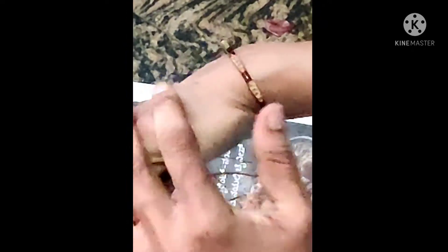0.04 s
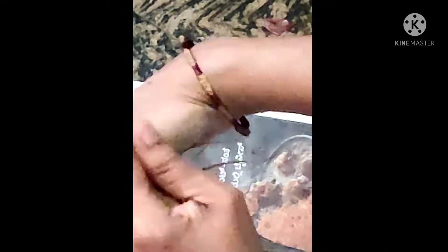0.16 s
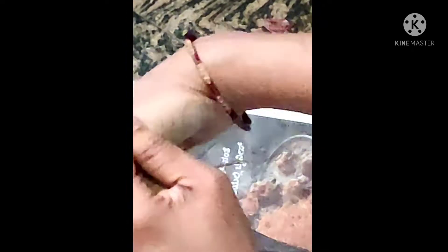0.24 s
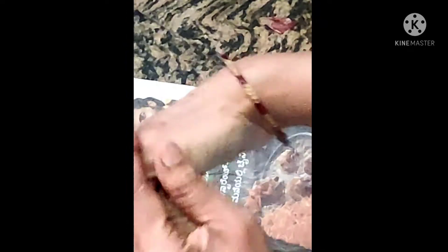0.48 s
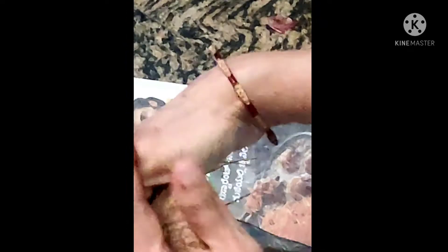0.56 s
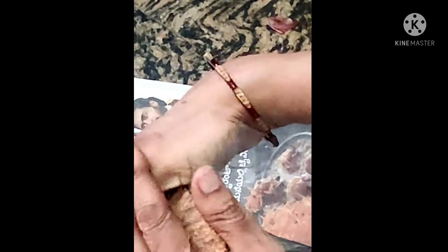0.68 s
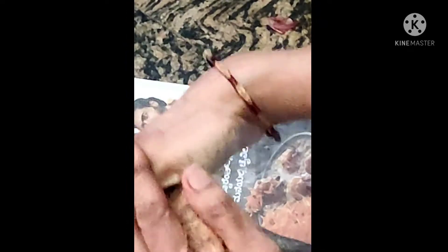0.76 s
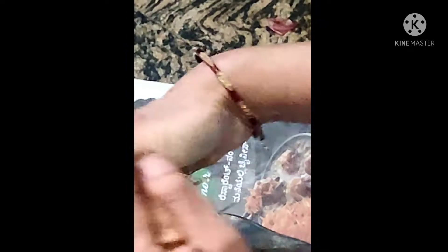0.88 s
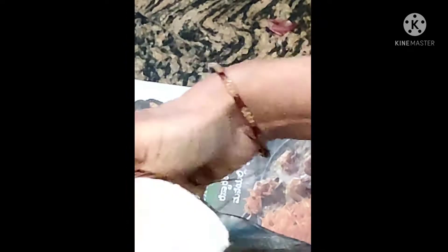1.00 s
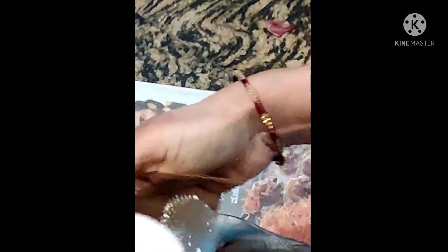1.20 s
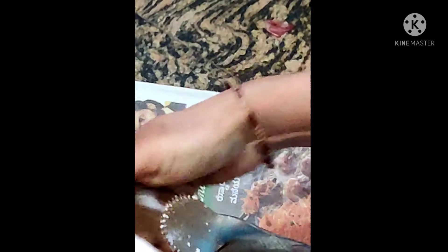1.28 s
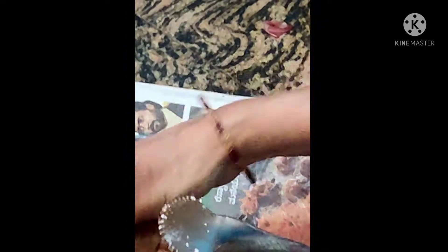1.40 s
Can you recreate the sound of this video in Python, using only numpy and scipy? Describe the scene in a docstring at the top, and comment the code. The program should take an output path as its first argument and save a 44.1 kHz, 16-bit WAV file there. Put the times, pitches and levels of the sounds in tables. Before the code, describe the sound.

Coconut flesh is pried from its shell with a knife: a small crack, then a much louder hollow crack ringing in a hard-walled kitchen, followed by soft knocks, rubs and faint scrapes, close to a phone microphone.

```python
"""A knife prises coconut flesh from its shell, close to a phone in a hard-walled kitchen.
The flesh gives with a small crack, then a loud one: bursts of noise, with fading tones for the hollow shell.
Soft knocks are short noise with tones, rubs are a swelling hum, scrapes are grainy noise; one click
is a single pulse and the hands bump dully. Fading noise makes the room's echo.
Behind it all lie a low hum of sine waves and the soft noise of room air."""
import sys
import numpy as np
from scipy import signal
from scipy.fft import rfft, irfft
from scipy.io import wavfile
from scipy.ndimage import uniform_filter1d

SR = 44100
rng = np.random.default_rng(int(sys.argv[2]) if len(sys.argv) > 2 else 0)


def to_wav(s):
    """Save 16-bit WAV."""
    ch = np.atleast_2d(s).T  # columns
    pcm = np.round(np.clip(ch, -1, 1) * 32767)  # PCM
    wavfile.write(sys.argv[1], SR, pcm.astype(np.int16))


N = 63945
T = np.arange(N) / SR  # seconds
HZ = np.maximum(np.fft.rfftfreq(N, 1 / SR), 1)  # kept above zero for the logarithms

# The two cracks of the flesh. Each row: start in seconds, snap level in dB, room level in dB,
# hollow ring level in dB, bass shelf in dB, top edge in Hz, left minus right of the snap in dB,
# pitch of the ring as a ratio.
CRACKS = [(0.2336, -27.5, -36.5, -37.5, -6.5, 7000, -9.5, 0.96),
          (0.3611, -9.5, -23, -23, -3.5, 8300, -3, 1)]
# The stages of each crack: a first split, a tear, the break.
# Each row: delay in seconds, level in dB, centre in Hz, decay time in seconds.
CRACK_STAGES = [(0, -16, 5000, .0006), (.0007, -1, 3000, .0007), (.002, 4, 7046, 0.0014)]
STAGE_RISE_S, STAGE_OCTAVES = 0.00038, 4.8
# Colour of the snap, then of its echo in the room. Each row: frequency in Hz, relative level in dB per Hz.
SNAP_COLOUR = [(80, -3.5), (400, -14.5), (800, -16), (1150, -7.5), (1550, 3), (2220, -8), (2930, 1),
               (4200, -6), (5200, -3.5), (6600, 4.5), (8200, -12), (9300, -22), (15000, -26.5)]
ECHO_COLOUR = [(60, -10), (110, -10), (180, -6), (280, -3.5), (480, -7), (720, 2.5), (1000, -5), (1250, -5),
               (1600, 1), (2300, -5.5), (3000, -1), (4200, -5.5), (5300, -3.5), (6500, 1), (8000, -6.5),
               (9300, -13), (15000, -19.5)]
BASS_SHELF_HZ, ECHO_DELAY_S = 1200, 0.003

# Ring of the hollow shell and the surface under it.
# Each row: frequency in Hz (before the pitch ratio), relative level in dB, time to fall 60 dB in seconds.
HOLLOW_MODES = [(189.8, -21.5, 0.91), (451.2, -18, 0.62), (526.8, -6.5, 0.21), (642, -8.5, 0.39),
                (675.3, -1, 0.31), (699.2, -10, 0.34), (1498, -15, 0.52), (2060, -12.5, .4),
                (2838, -9, .35), (2894, -8, .35)]
HOLLOW_RISE_S = 0.01
# The waver of every ring: level in dB, phase in radians, random points per second.
RING_WAVER_DB, RING_WAVER_RAD, RING_WAVER_RATE = 3, 0.56, 45

# Soft knocks of shell and blade.
# Each row: start in seconds, thud level in dB, ring level in dB, centre of the thud in Hz.
KNOCKS = [(.612, -39, -52, 1343), (.901, -59, -74, 2800), (1.120, -50.5, -65, 880),
          (1.1905, -44.5, -54, 1920), (1.230, -46.5, -55, 2370), (1.248, -43.5, -51, 1100)]
# What the knocks ring with. Each row: frequency in Hz, relative level in dB, time to fall 60 dB in seconds.
KNOCK_MODES = [(713, 6, 0.1333), (827.5, -2, 0.3), (1329, -4, 0.25), (1595, -0.5, 0.5), (1804, -7.5, 0.81),
               (2503, -2.5, 0.33)]
KNOCK_DECAY_S, KNOCK_OCTAVES = 0.0052, 0.56
KNOCK_ROOM_DB = -15.5  # relative to the thud

# Rubs that make the hollow hum.
# Each row: time of the peak in seconds, level in dB, rise in seconds, fall in seconds.
RUBS = [(0.516, -44, 0.017, 0.025), (0.676, -55.5, 0.0056, 0.027), (0.731, -46, 0.016, 0.021),
        (1.312, -47.5, 0.058, 0.071)]
RUB_HZ, RUB_WIDTH_HZ = 673, 83
RUB_ROUGH = 0.57  # share of noise beside the steady tone

# Blade scrapes. Each row: start in seconds, level in dB, decay time in seconds, centre in Hz,
# room level in dB relative to the scrape.
SCRAPES = [(0.057, -63.5, .03, 11050, -12), (0.212, -55.5, 0.0049, 4770, -10), (.925, -68, .15, 5030, -26),
           (1.113, -64, 0.0135, 5380, 0), (1.246, -58, 0.098, 3300, -3)]
# Colour of the blade. Each row: frequency in Hz, relative level in dB.
BLADE_COLOUR = [(1000, 1.5), (3500, -3), (5200, -8.5), (6500, 1), (7600, -10.5), (9300, -19.5),
                (12500, -14), (15000, -22)]
SCRAPE_OCTAVES, SCRAPE_GRAIN = 1.15, 0.52
# One dry click of the blade tip: time in seconds, level in dB, centre in Hz.
CLICK_S, CLICK_DB, CLICK_HZ = 1.085, -32.5, 5720

# Dull bumps of the hands. Each row: start in seconds, level in dB.
BUMPS = [(1.262, -44.5), (1.313, -47), (1.35, -46), (1.384, -49)]
# Colour of the bumps. Each row: frequency in Hz, relative level in dB.
BUMP_COLOUR = [(30, -15), (75, -2.5), (140, 8), (220, -7), (400, -6), (1000, -42), (4000, -50.5)]
BUMP_DECAY_S = 0.031

# How long the kitchen echoes. Each row: frequency in Hz, time to fall 60 dB in seconds.
ROOM_T60 = [(150, 0.36), (600, 1), (1500, 0.48), (3000, 0.54), (6000, 0.51), (9000, 0.41), (15000, 0.12)]
EARLY_DB, EARLY_S, ROOM_RISE_S = -3, 0.057, 0.001
ROOM_BUILD_CYCLES = 1  # low notes take longer to fill the room
# How alike left and right are. Each row: frequency in Hz, correlation from -1 to 1.
LIKENESS = [(60, 0.9), (250, 0.93), (600, 0.62), (1100, -0.097), (2200, 0.15), (4500, 0.067),
            (12000, -0.18)]

# Low hum, likely a motor. Each row: frequency in Hz, level in dB.
HUM = [(38.3, -44.5), (76.5, -62), (114, -64), (193, -68)]
HUM_WAVER_DB, HUM_WAVER_RAD = -0.6, 0.11
# Colour of the room air. Each row: frequency in Hz, relative level in dB per Hz.
AIR_COLOUR = [(20, 2), (40, 3), (90, -6.5), (170, -9.5), (280, -15.5), (480, -15.5), (690, -14.5),
              (1100, -16.5), (2200, -26), (4500, -32.5), (6700, -33.5), (9300, -46.5), (12500, -50),
              (15000, -59.5)]
AIR_DB = -51.5

TOP_HZ, CEILING = 15300, 1  # the phone's highest frequency and largest peak


def undb(db):
    """Turn decibels into a gain."""
    return 10 ** (np.asarray(db) / 20)


def curve(points, hz=HZ):
    """Read (Hz, value) points on a log-frequency axis."""
    point_hz, values = np.array(points).T
    return np.interp(np.log(hz), np.log(point_hz), values)


def tint(x, gain):
    """Filter by a gain per frequency, keeping the power of white noise."""
    return irfft(rfft(x) * gain / np.sqrt(np.mean(gain ** 2)), N)


def hump(hz, octaves):
    """A bell-shaped gain around a centre frequency."""
    return 1 / (1 + (np.log2(HZ / hz) / octaves) ** 2) ** 1.5


def noise():
    """Stereo noise, alike in the bass and nearly unrelated in the treble."""
    likeness = np.clip(curve(LIKENESS), -.99, .99)
    mid, side = rfft(rng.standard_normal((2, N)))
    mid = mid * np.sqrt((1 + likeness) / 2)
    side = side * np.sqrt((1 - likeness) / 2)
    return irfft(np.array([mid + side, mid - side]), N)


def walk(rate):
    """A smoothed random wander around zero; rate is in random points per second."""
    steps = np.interp(T * rate, np.arange(400), rng.standard_normal(400))
    return uniform_filter1d(steps, size=200)


def strike(at, rise, fall, hold=0):
    """Loudness shape of a blow: a straight rise and an exponential fall that starts after the hold."""
    return np.clip((T - at) / rise, 0, 1) * np.exp(-np.maximum(T - at - hold, 0) / fall)


def echo(room, at, gain):
    """The room's answer to a blow of a given time and colour."""
    start = int(at * SR)
    return np.pad(tint(room, gain), ((0, 0), (start, 0)))[:, :N]


def ring(at, modes, rise):
    """Fading tones that waver in the hand; the higher ones reach the two microphones out of step."""
    out = 0
    for hz, db, t60 in modes:
        skew = rng.standard_normal() * min(hz / 2500, 1) * np.array([[1], [-1]])
        phase = 2 * np.pi * hz * (T - at) + RING_WAVER_RAD * walk(RING_WAVER_RATE)
        wavering_level = undb(db + RING_WAVER_DB * walk(RING_WAVER_RATE))
        size = wavering_level * strike(at, rise, t60 / np.log(1000))
        out = out + size * np.sin(phase + skew)
    return out


def cracks(room):
    """Flesh tears from the shell in a few milliseconds, setting the hollow and the room ringing."""
    out = 0
    for at, snap_db, room_db, ring_db, bass_db, edge_hz, pan_db, pitch in CRACKS:
        shelf = undb(bass_db / (1 + (HZ / BASS_SHELF_HZ) ** 4))
        # above the edge the sound is weaker but not gone
        shape = shelf * (undb(-6) + 1 / (1 + (HZ / edge_hz) ** 24))
        side_db = np.array([[pan_db], [-pan_db]]) / 2
        for delay, db, hz, fall in CRACK_STAGES:
            burst = noise() * strike(at + delay, STAGE_RISE_S, fall, STAGE_RISE_S)
            snap = tint(burst, undb(curve(SNAP_COLOUR)) * shape * hump(hz, STAGE_OCTAVES))
            out = out + snap * undb(snap_db + db + side_db)
        answer = echo(room, at + ECHO_DELAY_S, undb(curve(ECHO_COLOUR)) * shape)
        modes = [(hz * pitch, db, t60) for hz, db, t60 in HOLLOW_MODES]
        out = out + undb(room_db) * answer
        out = out + undb(ring_db) * ring(at, modes, HOLLOW_RISE_S)
    return out


def knocks(room):
    """Shell and blade bump softly: a short thud, a ring and an echo."""
    out = 0
    for at, thud_db, ring_db, hz in KNOCKS:
        gain = hump(hz, KNOCK_OCTAVES)
        thud = tint(noise(), gain) * strike(at, 0.00047, KNOCK_DECAY_S)
        thud = thud + undb(KNOCK_ROOM_DB) * echo(room, at, gain)
        out = out + undb(thud_db) * thud
        out = out + undb(ring_db) * ring(at, KNOCK_MODES, 0.0012)
    return out


def rubs():
    """Rubbing swells the main resonance of the hollow: a steady tone with noise around it."""
    swell = 0
    for at, db, rise, fall in RUBS:
        before = np.exp(-((T - at) / rise) ** 2)
        after = np.exp(-abs(T - at) / fall)
        swell = swell + undb(db) * np.where(T < at, before, after)
    grain = tint(noise(), 1 / (1 + (2 * (HZ - RUB_HZ) / RUB_WIDTH_HZ) ** 2))
    tone = np.sqrt(2) * np.sin(2 * np.pi * RUB_HZ * T)
    return swell * (tone + RUB_ROUGH * grain)


def scrapes(room):
    """The blade drags over the flesh: noise whose strength flickers in grains."""
    out = 0
    for at, db, fall, hz, room_db in SCRAPES:
        gain = hump(hz, SCRAPE_OCTAVES) * undb(curve(BLADE_COLOUR))
        grains = np.exp(SCRAPE_GRAIN * walk(300) - SCRAPE_GRAIN ** 2)
        drag = tint(noise() * grains * strike(at, 0.00092, fall), gain)
        out = out + undb(db) * (drag + undb(room_db) * echo(room, at, gain))
    return out


def click():
    """The blade tip slips once, too lightly to wake the room: one coloured pulse."""
    pulse = signal.unit_impulse(N, int(CLICK_S * SR))
    gain = hump(CLICK_HZ, SCRAPE_OCTAVES) * undb(curve(BLADE_COLOUR))
    return undb(CLICK_DB) * tint(pulse, gain)


def hands():
    """Low bumps as the shell is turned over: short bursts of dull noise."""
    bumps = sum(undb(db) * strike(at, 0.0036, BUMP_DECAY_S) for at, db in BUMPS)
    return tint(noise(), undb(curve(BUMP_COLOUR))) * bumps


def kitchen():
    """The room's answer to a blow: dense early reflections, then a tail whose top treble dies first."""
    source = rfft(noise())
    centres = np.geomspace(100, 16000, 9)
    out = 0
    # each pick selects one of nine overlapping bands
    for hz, pick in zip(centres, np.eye(len(centres))):
        band = irfft(source * np.interp(np.log(HZ), np.log(centres), pick), N)
        rise = ROOM_RISE_S + ROOM_BUILD_CYCLES / hz
        out = out + band * strike(0, rise, curve(ROOM_T60, hz) / np.log(1000))
    return out * (1 + undb(EARLY_DB) * strike(0, ROOM_RISE_S, EARLY_S))


def background():
    """A low hum, likely a motor, made of wavering sine waves, with noise for the air of the room."""
    hum = 0
    for hz, db in HUM:
        size = undb(db + HUM_WAVER_DB * walk(2)) * np.sqrt(2)
        hum = hum + size * np.sin(2 * np.pi * hz * T + HUM_WAVER_RAD * walk(1.9))
    return hum + undb(AIR_DB) * tint(noise(), undb(curve(AIR_COLOUR)))


def scene():
    """All the sounds of the kitchen, left and right."""
    room = kitchen()
    return cracks(room) + knocks(room) + rubs() + scrapes(room) + click() + hands() + background()


def record(dry):
    """The phone rounds off high peaks and cuts the top frequencies."""
    rounded = dry / (1 + (dry / CEILING) ** 4) ** (1 / 4)
    return signal.sosfilt(signal.ellip(8, .2, 70, TOP_HZ, fs=SR, output="sos"), rounded)


dry = scene()
out = record(dry)
to_wav(out)
```